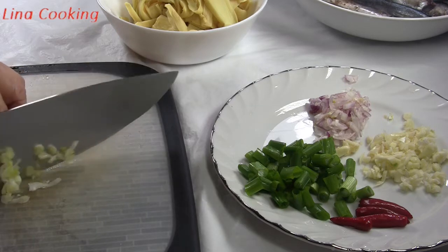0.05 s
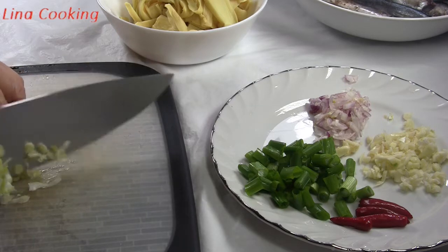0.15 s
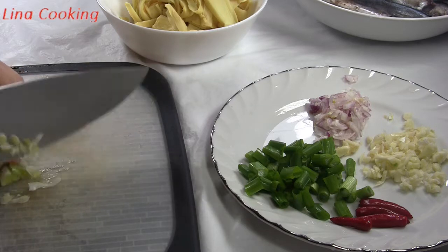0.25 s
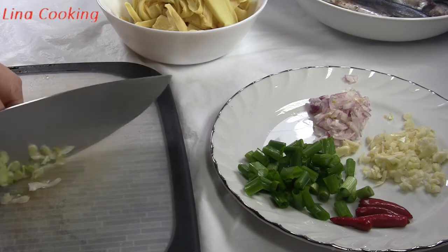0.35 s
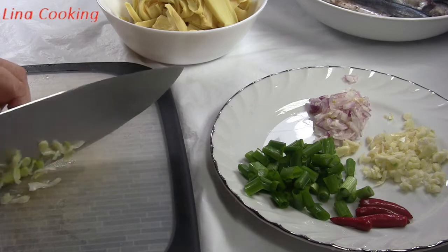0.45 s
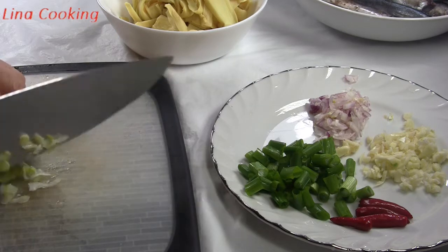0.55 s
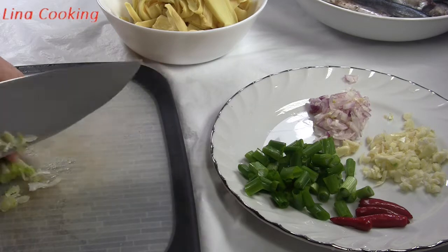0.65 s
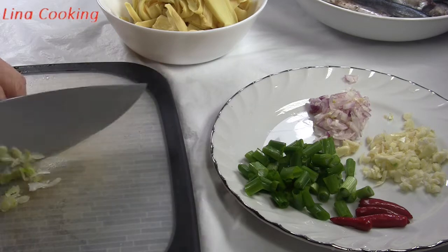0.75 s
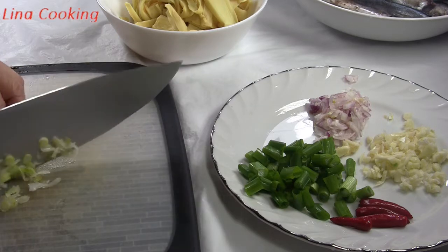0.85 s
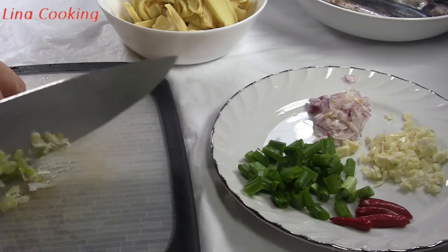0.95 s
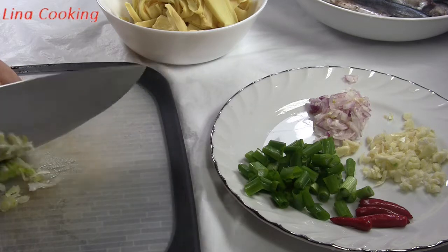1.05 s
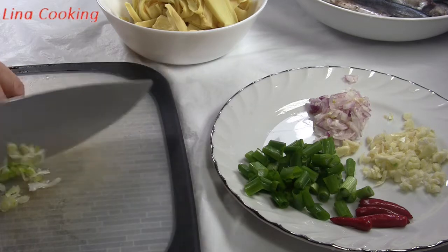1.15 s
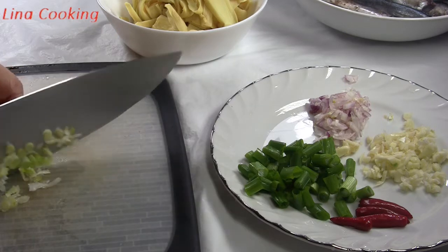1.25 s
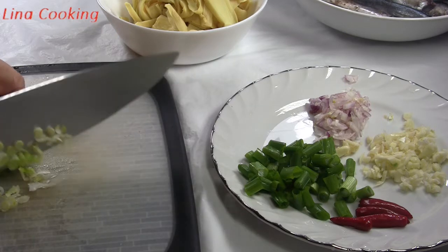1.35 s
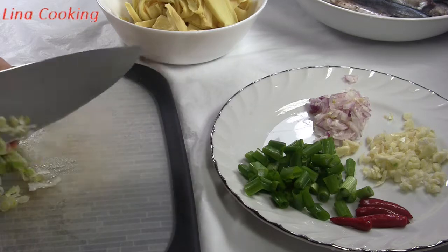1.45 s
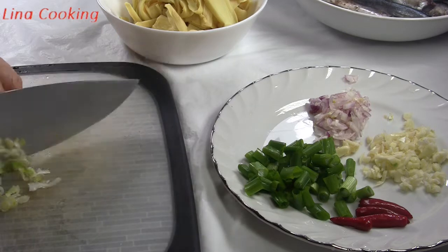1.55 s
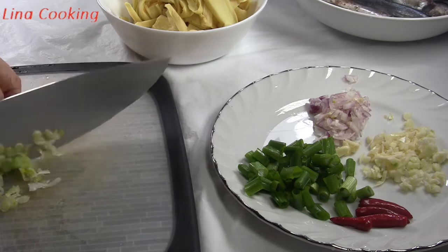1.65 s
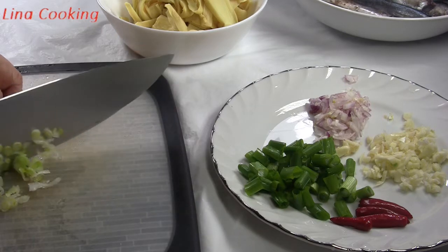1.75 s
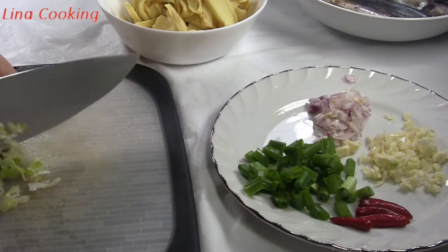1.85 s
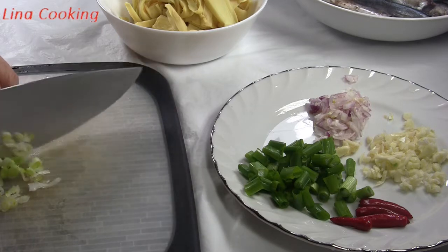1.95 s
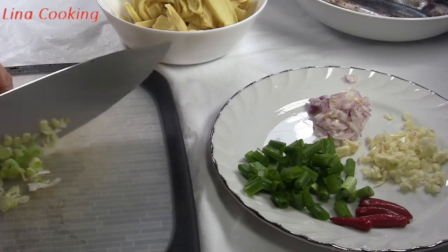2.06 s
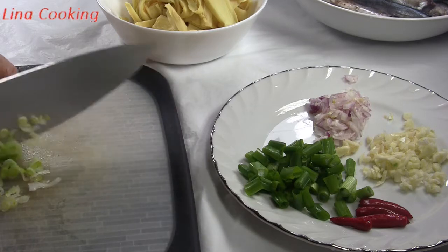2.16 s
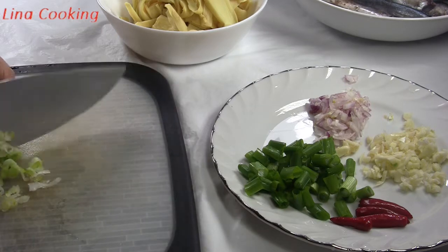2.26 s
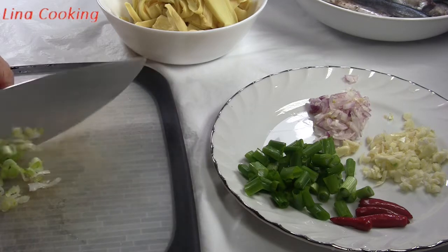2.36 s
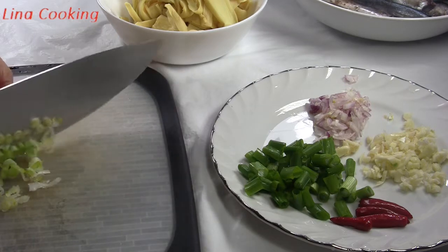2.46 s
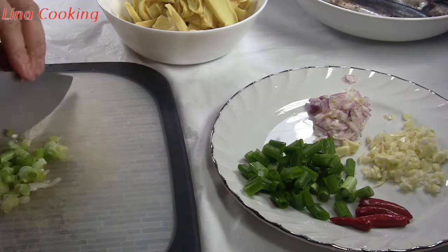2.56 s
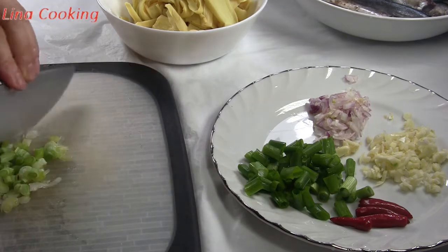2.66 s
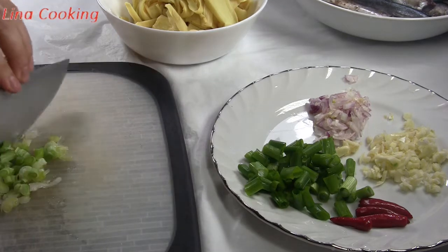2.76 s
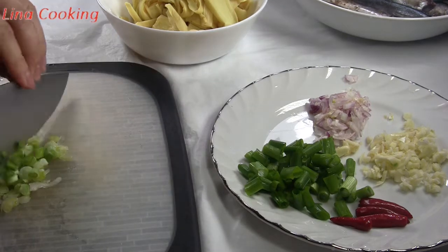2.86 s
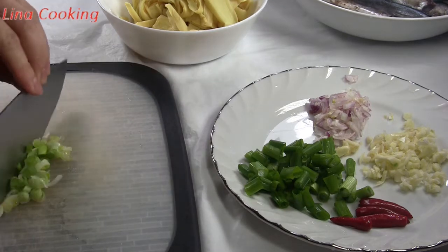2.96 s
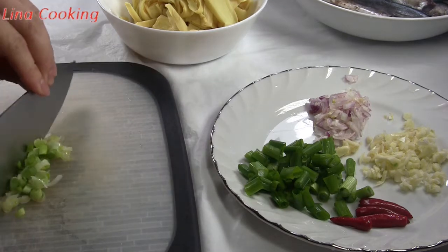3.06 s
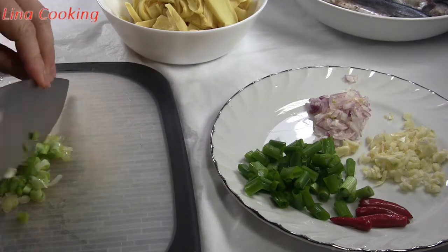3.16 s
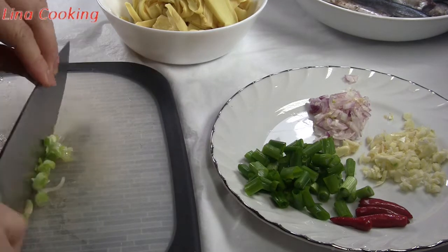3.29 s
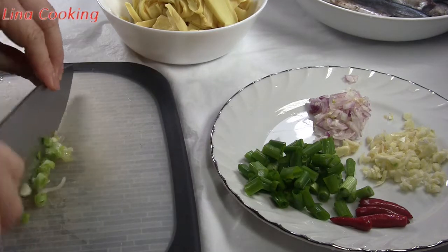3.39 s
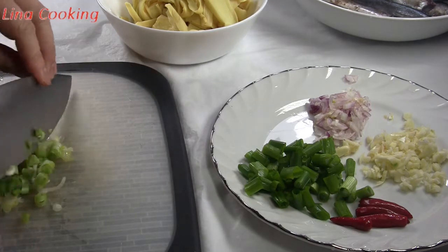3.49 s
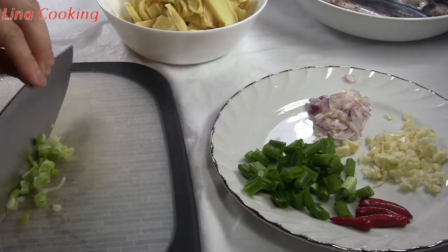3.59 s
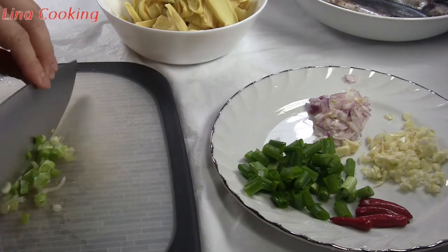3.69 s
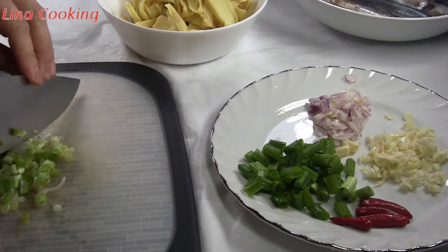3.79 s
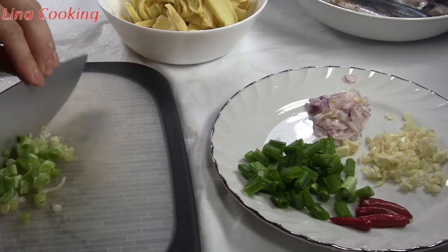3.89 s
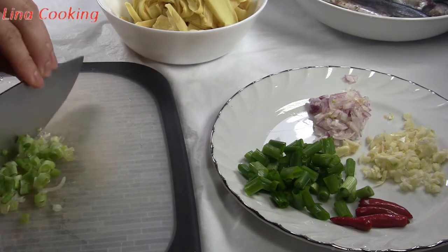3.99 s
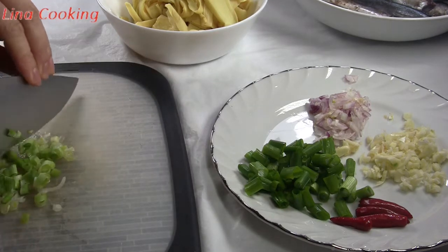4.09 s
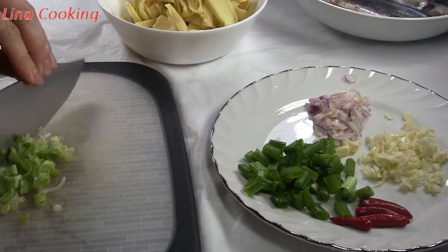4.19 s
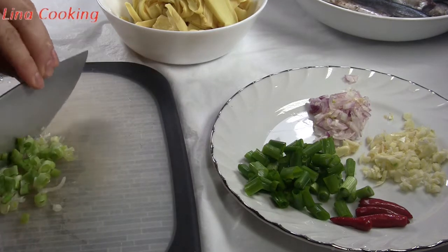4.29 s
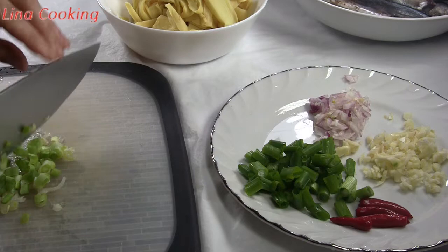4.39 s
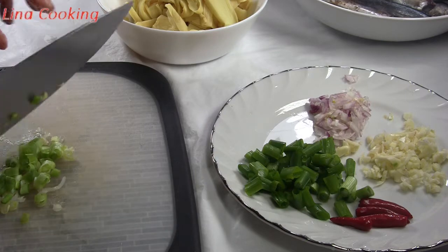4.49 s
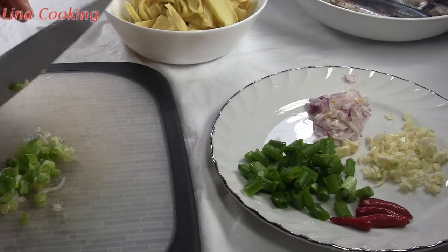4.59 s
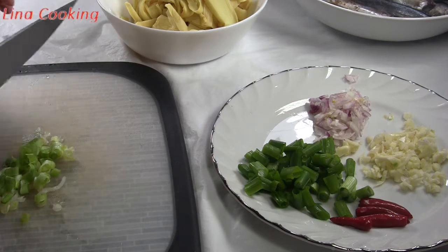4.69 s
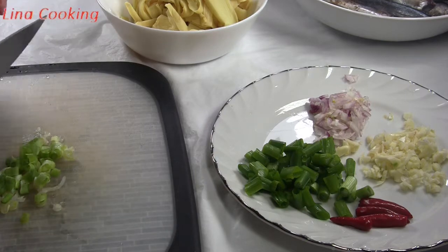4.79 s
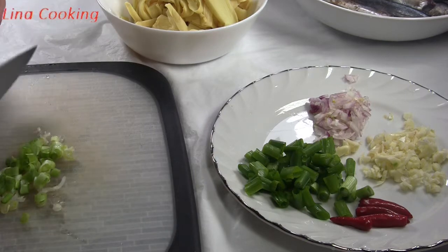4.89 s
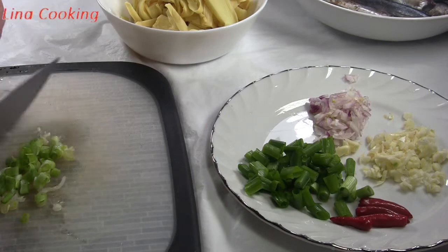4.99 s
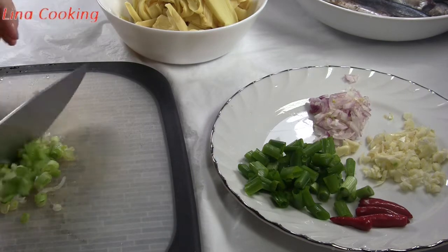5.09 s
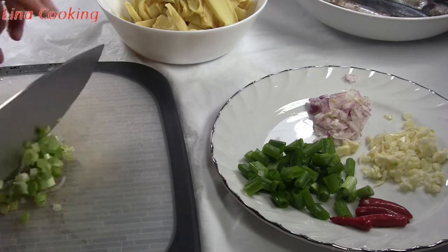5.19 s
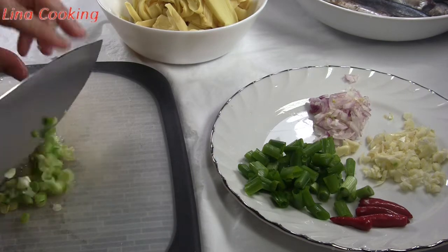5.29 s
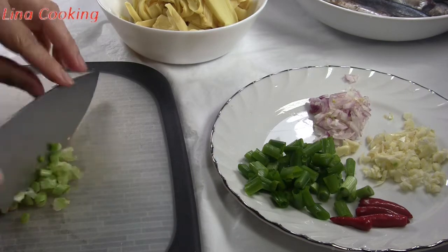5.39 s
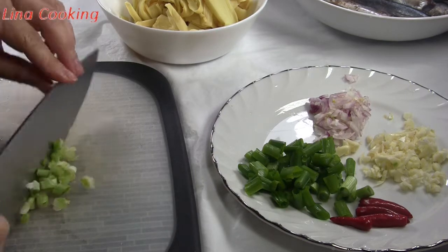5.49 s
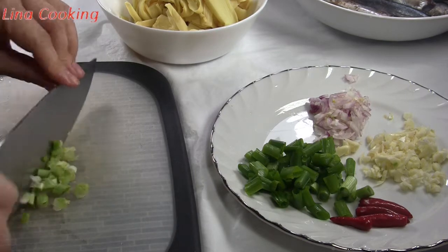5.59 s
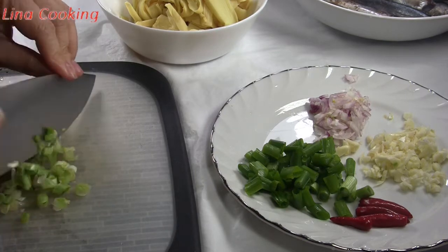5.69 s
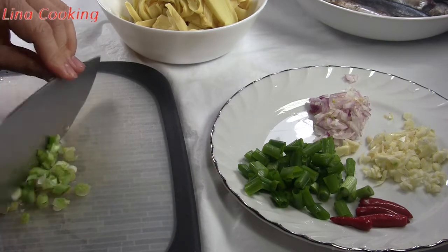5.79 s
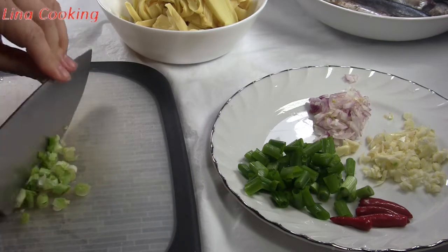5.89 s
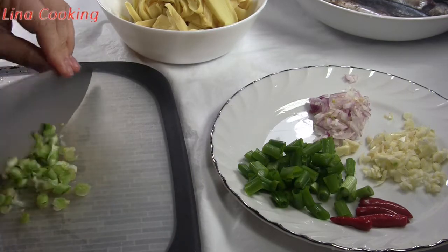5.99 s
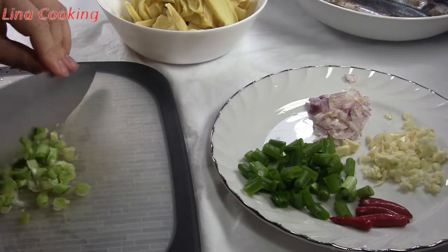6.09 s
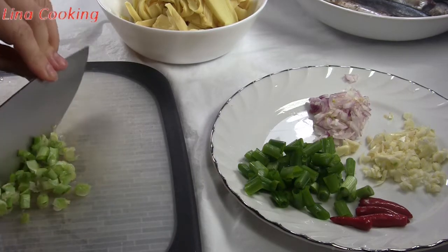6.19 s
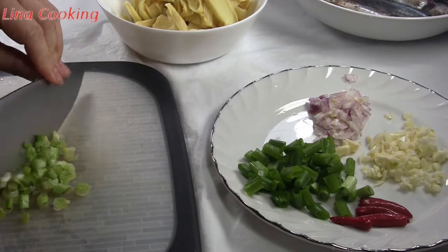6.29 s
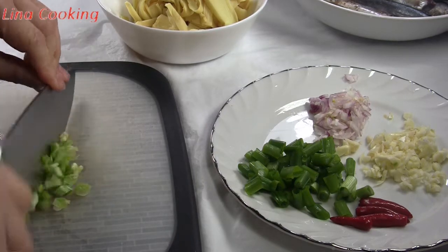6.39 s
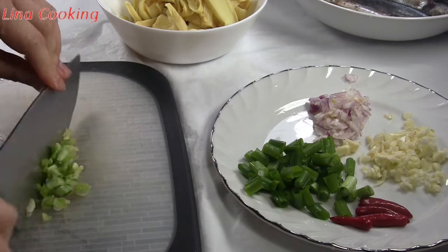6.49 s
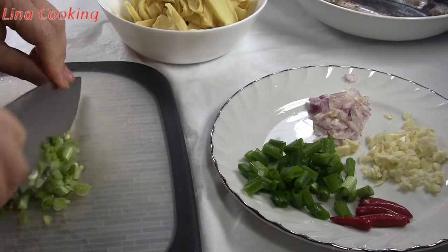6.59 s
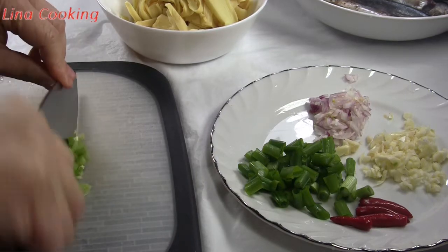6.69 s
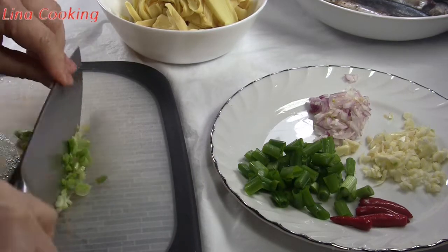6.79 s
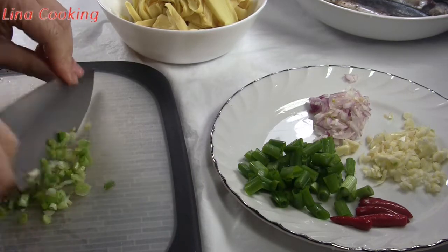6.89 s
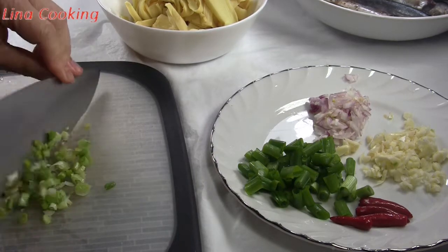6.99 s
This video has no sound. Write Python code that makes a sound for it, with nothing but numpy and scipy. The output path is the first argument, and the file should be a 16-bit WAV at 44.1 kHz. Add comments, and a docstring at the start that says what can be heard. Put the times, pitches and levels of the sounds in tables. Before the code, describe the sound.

Seven spaced knife blows knock sharply on a thin board over a table, each preceded by a tiny vegetable crunch. The blade then rocks through the pile with gentle crackling, fine hiss and dull closing knocks, pauses, clunks down with a quick steely scrape, and continues mincing. Close stereo microphones in a lightly reverberant kitchen, slightly overloaded by the hardest chops, with low air noise and hum.

```python
"""In a kitchen, microphones close to a plastic board hear a chef's knife mince spring onions over faint hum.
First come seven free chops, then rocking cuts, with light taps on the board between most of them: bursts of
tiny snaps make the crunch, and each stroke ends in a knock that rings the modes of board and table. After a
pause the blade is set down and scraped across the board, friction ringing its steel modes; then the rocking
goes on. Echoes and a diffuse tail answer from the room, and the peaks of the hardest chops are flattened."""
import sys
import numpy as np
from scipy import signal
from scipy.fft import rfft, irfft, next_fast_len
from scipy.io import wavfile

SR = 44100
rng = np.random.default_rng(int(sys.argv[2]) if len(sys.argv) > 2 else 0)


def store_pcm(level_fs):
    """Save levels as 16-bit WAV."""
    pcm = np.round(np.clip(level_fs, -1, 1) * 32767).astype(np.int16)
    wavfile.write(sys.argv[1], SR, np.atleast_2d(pcm).T)


N = 310905
T = np.arange(N) / SR


def from_db(db):
    """Decibels to gain."""
    return 10 ** (np.asarray(db) / 20)


def rms_one(x):
    """Scale to unit power."""
    return x / np.sqrt(np.mean(x ** 2) + 1e-20)


def at_hz(points, hz):
    """Read a table on a log-frequency axis."""
    table = np.array(points)
    return np.interp(np.log(np.maximum(hz, 1)), np.log(table[:, 0]), table[:, 1])


def butter(x, hz, kind, order=2):
    """Causal low- or high-pass."""
    sos = signal.butter(order, np.clip(hz, 10, .45 * SR), kind, fs=SR, output="sos")
    return signal.sosfilt(sos, x)


def colour(x, spectrum):
    """Give a steady sound a spectrum; rms 1."""
    size = next_fast_len(N)
    gain = from_db(at_hz(spectrum, np.fft.rfftfreq(size, 1 / SR)))
    return rms_one(irfft(rfft(x, size) * gain, size)[..., :N])


def drift(rate):
    """Random wander along straight lines between `rate` normal draws a second."""
    return np.interp(T * rate, np.arange(N // 10), rng.standard_normal(N // 10))


def delayed(x, lag_s):
    """The sound as it arrives lag_s later; the lag may change with time."""
    return np.interp(T - lag_s, T, x)


def add(out, s, sound):
    """Mix a sound in at time s."""
    i = max(round(s * SR), 0)
    out[i:i + len(sound)] += sound[:max(N - i, 0)]


def ring(force, hz, t60):
    """A mode radiating sound: a unit click sets it ringing at height 1; steady force makes none."""
    r, w = from_db(-60 / (t60 * SR)), 2 * np.pi * hz / SR
    return signal.lfilter([1 / 2, 0, -1 / 2], [1, -2 * r * np.cos(w), r * r], force + 1e-18)


def grains(per_s, spread_db):
    """Random tiny snaps of uneven size; rms 1."""
    sizes = from_db(spread_db * np.minimum(rng.exponential(1, N), 4)) * rng.choice([-1, 1], N)
    return rms_one(sizes * (rng.random(N) < per_s / SR))


# likeness of diffuse sound at the two microphones: (frequency [Hz], left-right correlation [-1 to 1])
MIC_LIKENESS = [(50, 0.49), (300, 0.73), (1000, 0.39), (2500, 0), (5000, 0.021), (15000, 0)]


def diffuse(size):
    """White stereo noise from all directions: alike in the bass, unrelated in the treble."""
    mid, side = rfft(rng.standard_normal((2, size)))
    alike = np.clip(at_hz(MIC_LIKENESS, np.fft.rfftfreq(size, 1 / SR)), -1, 1)
    shared = np.sqrt((1 + alike) / 2) * mid
    opposed = np.sqrt((1 - alike) / 2) * side * [[1], [-1]]
    return irfft(shared + opposed, size)


# spectrum of the kitchen's air: (frequency [Hz], relative level [dB])
AIR_SPECTRUM = [(20, -21), (40, -3.5), (70, 2.5), (105, -1), (150, 2.5), (200, 0.5), (280, 3.5), (480, -4),
                (1000, -14), (2500, -15.5), (8000, -22.5), (14000, -26.5)]


def background(air_db=-50, hum_hz=60, hum_db=-62):
    """Steady room air from all around, with a faint mains hum."""
    air = colour(diffuse(next_fast_len(N)), AIR_SPECTRUM)
    hum = np.sin(2 * np.pi * hum_hz * T)
    return from_db(air_db) * air + from_db(hum_db) * hum


# strength of the kitchen's reverberation: (frequency [Hz], level against the knife's own sound [dB])
TAIL_LEVEL = [(100, -7), (250, -5), (550, -2.5), (850, -12), (1300, -10), (2300, -16), (5000, -11),
              (12000, -8)]
# how long it lasts: (frequency [Hz], time to fall 60 dB [s])
TAIL_T60 = [(100, 0.45), (450, 0.59), (800, 0.66), (1600, 0.57), (4000, 0.45), (9000, 0.45), (15000, 0.15)]
# wall echoes: (delay [s], level [dB])
WALL_ECHOES = [(.0075, -17), (0.0248, -25.5), (0.0525, -43)]


def kitchen(x, build_s=0.0027, echo_hz=2500):
    """A few wall echoes and a diffuse tail that dies sooner in the treble."""
    t, edges = T[:SR], np.geomspace(60, 18000, 15)
    noise, hz, response = rfft(diffuse(SR)), np.fft.rfftfreq(SR, 1 / SR), np.zeros((2, SR))
    for low, high in zip(edges, edges[1:]):
        in_band = (hz >= low) * (hz < high)
        band = irfft(noise * in_band * from_db(at_hz(TAIL_LEVEL, hz)), SR)
        t60 = at_hz(TAIL_T60, np.sqrt(low * high))
        decay = from_db(-60 * t / t60) * (1 - np.exp(-t / build_s))
        response += band * decay / np.linalg.norm(decay)
    for s, db in WALL_ECHOES:
        echo = signal.unit_impulse(SR, round(s * SR))
        response += from_db(db) * butter(echo, echo_hz, "low", order=1)
    return signal.fftconvolve(x[None], response, axes=1)[:, :N]


# the steel blade's modes: (frequency [Hz], relative level when rubbed [dB], time to fall 60 dB [s])
BLADE_MODES = [(475, -28, 0.17), (836, -3, 0.011), (1576, -9, 0.13), (1643, -0.5, 0.073),
               (2243, -10, 0.079), (3720, -15, 0.39), (4180, -6.5, 0.071), (5340, -7.5, 0.037),
               (6200, -8.5, 0.068), (8550, -20, .06), (9600, -19, 0.093), (11200, -25, .08)]
# spectrum of the rubbing itself: (frequency [Hz], relative level [dB])
RUB_SPECTRUM = [(200, -1), (700, -11), (1500, 6.5), (2800, 7.5), (4200, 9.5), (6000, 3), (9000, 3),
                (12500, 4), (15500, -2)]
SET_DOWN_S = 4.9925
SCUFF_DB, SCUFF_S = -34, .009   # it scuffs as it lands: relative level, decay time
# then it skids sideways
SKID_S, SKID_DB, SKID_ATTACK_S, SKID_HOLD_S, SKID_RELEASE_S = 5.012, -25, 0.032, 0.051, 0.016


def scrape(rub_db=-1.0, blade_db=-4, bend_db=-18):
    """The blade lands and its first bending mode hums; then it skids, and friction rings all its modes."""
    rubbing, t = np.zeros(N), T[:SR // 2]
    release = np.exp(-np.maximum(t - SKID_ATTACK_S - SKID_HOLD_S, 0) / SKID_RELEASE_S)
    skid = np.minimum(t / SKID_ATTACK_S, 1) * release
    add(rubbing, SET_DOWN_S, from_db(SCUFF_DB) * np.exp(-t / SCUFF_S))
    add(rubbing, SKID_S, from_db(SKID_DB) * skid)
    slips = grains(per_s=7400, spread_db=0.5) * from_db(2.0 * drift(300))
    steel = np.zeros(N)
    for hz, db, t60 in BLADE_MODES:
        # each mode's build-up under steady rubbing is divided out
        build_up = np.sqrt(t60 * SR / (4 * np.log(1000)))
        steel += from_db(db) * ring(slips * rubbing, hz, t60) / build_up
    # the pitches waver as the point of contact slides along the edge
    steel = delayed(steel, .00015 * drift(35))
    out = from_db(rub_db) * rubbing * colour(slips, RUB_SPECTRUM) + from_db(blade_db) * steel
    bend_hz, _, bend_t60 = BLADE_MODES[0]
    add(out, SET_DOWN_S, from_db(bend_db) * ring(signal.unit_impulse(SR), bend_hz, bend_t60))
    return out


# free chops: (time the edge meets the board [s], blow [dB], thump [dB], time in the stalks [s], crunch [dB],
# swell of the crunch [dB], lead by which it grazes the pile earlier [s], graze [dB]); all levels relative
FREE_CHOPS = [(0.0649, -8.5, 4.5, 0.024, -25, 9.5, 0.043, -35.5),
              (.3948, -2, 0, 0.025, -21, 14.5, 0.045, -27), (0.86, -16, 0.5, 0.033, -25, 5, 0.07, -38.5),
              (1.2334, 2.5, -2.5, 0.025, -25.5, 4, 0.058, -41),
              (1.6764, 1, -5, 0.032, -25.5, 13.5, .067, -37),
              (2.0447, 2, -5, 0.019, -22.5, 5, 0.073, -39.5), (2.4111, 1, -5.5, 0.031, -25, 12, 0.086, -42)]
CHOP_FORCE_DB, GRAZE_FORCE_DB = 10.5, 1   # share of the crunch passed to the board
GRAZE_S, GRAZE_FADE_DB = 0.017, 12.5   # a graze fades to a faint crackle that lasts until the cut
# rocking cuts: (time the edge touches down [s], touch [dB], time to press through [s], crunch [dB],
# swell of the crunch [dB], closing knock [dB], thump [dB], drag on lifting [dB]); all levels relative
ROCKING_CUTS = [(2.713, -22, 0.045, -28.5, 14, -23.5, -12, -47.5),
                (2.9523, -5, 0.1, -33, 26, -23.5, -8, -47),
                (3.2968, -18, 0.052, -32.5, 4.5, -17.5, -3.5, -57),
                (3.613, -20, 0.052, -31, 4, -27, -7.5, -52.5),
                (3.927, -19.5, .056, -29.5, 25, -36, -27, -53),
                (4.238, -25.5, 0.055, -30.5, 5.5, -37, -14, -44),
                (5.502, -27, 0.064, -28, 4, -20.5, -9.5, -36.5),
                (5.841, -18.5, 0.057, -25.5, 13, -27, -21, -43.5),
                (6.171, -20.5, 0.053, -26, 17, -25, -6, -48), (6.456, -26, 0.047, -30, 18, -30, -8.5, -39),
                (6.777, -24.5, 0.053, -27.5, 24, -16.5, -18, -44.5)]
# share of the crunch passed to the board; part of the press after which the crunch stops growing
ROCK_FORCE_DB, ROCK_CREST = 2, 0.73
# the blade brushes the pile on its way down
BRUSH_S, BRUSH_DB, BRUSH_SWELL_DB, BRUSH_FORCE_DB = 0.041, -44, 20.5, 6.5
# the blade lifts out through the wet pile
DRAG_AFTER_S, DRAG_S, DRAG_FADE_DB, DRAG_FORCE_DB = 0.035, 0.049, 1.5, 0
# a firm stalk gives way at once: (time [s], crunch [dB], jolt to the board [dB]); levels relative
STALK_SNAPS = [(.0411, -29, -17), (.544, -30, -45), (2.003, -27, -23.5), (2.399, -28, -11),
               (3.957, -22.5, -31), (4.336, -30, -39), (5.8825, -29.5, -13.5), (6.192, -18, -12),
               (6.205, -17.5, -14.5), (6.488, -25.5, -32)]
SNAP_S, SNAP_FORCE_DB = 0.004, -4
# longer rustles, as the blade lifts out or nudges loose pieces:
# (time [s], length [s], crunch [dB], share passed to the board [dB]); levels relative
PILE_RUSTLES = [(0.063, 0.03, -38.5, 12.5), (.475, 0.033, -39, -12), (0.858, 0.053, -36, 8.5),
                (2.838, 0.024, -51.5, 19.5), (5.432, 0.062, -47, 0)]


def bites():
    """Every passage through onion: (s, length s, level dB, swell dB, swell time s, share to the board dB)."""
    rows = []
    for s, _, _, cut_s, db, swell_db, lead_s, graze_db in FREE_CHOPS:
        crackle_db = graze_db - GRAZE_FADE_DB
        rows += [(s - lead_s, lead_s - cut_s, crackle_db, -GRAZE_FADE_DB, GRAZE_S, GRAZE_FORCE_DB),
                 (s - cut_s, cut_s, db, swell_db, cut_s, CHOP_FORCE_DB)]
    for s, _, press_s, db, swell_db, _, _, drag_db in ROCKING_CUTS:
        lift_s = s + press_s + DRAG_AFTER_S
        rows += [(s - BRUSH_S, BRUSH_S, BRUSH_DB, BRUSH_SWELL_DB, BRUSH_S, BRUSH_FORCE_DB),
                 (s, press_s, db, swell_db, ROCK_CREST * press_s, ROCK_FORCE_DB),
                 (lift_s, DRAG_S, drag_db, -DRAG_FADE_DB, DRAG_S, DRAG_FORCE_DB)]
    rows += [(s, SNAP_S, db, 0, SNAP_S, SNAP_FORCE_DB) for s, db, _ in STALK_SNAPS]
    return rows + [(s, length, db, 0, length, force_db) for s, length, db, force_db in PILE_RUSTLES]


# spectrum of the bursting stalks: (frequency [Hz], relative level per Hz [dB])
CRUNCH_SPECTRUM = [(150, -17), (500, -7), (900, 6), (1650, 12), (2400, 3), (4000, 7.5), (6000, 7.5),
                   (9000, 2.5), (12500, 1.5), (15500, 0.5)]
# the board's plate modes: (frequency [Hz], relative level [dB], time to fall 60 dB [s])
BOARD_MODES = [(470, -16.5, 0.024), (581, -17, 0.031), (674, -16, 0.037), (797, -3, 0.018),
               (909, -15.5, 0.023), (1094, -28.5, 0.035), (1310, -21, 0.024), (1540, -19, 0.01),
               (1950, -48, 0.0021), (2870, -12, 0.004)]
# board and table bouncing together: (frequency [Hz], relative level [dB], time to fall 60 dB [s])
TABLE_MODES = [(138.6, -32, 0.085), (173, -27.5, 0.066), (226.2, -18, 0.06), (272, -17.5, 0.037),
               (357.6, -18.5, 0.034)]
ROCKING_S = 2.6   # from here on the blade rocks and slices


def cuts(bite_s=0.0029, release_s=0.0027, clump_db=3.0, board_db=-21, table_db=-2.5, soft_hz=2000,
         slice_db=-4, slice_hz=10500):
    """Cell walls burst in clumps under the edge: a bright crunch, while coarser snaps drum on the board."""
    loud, push, t = np.zeros(N), np.zeros(N), T[:SR // 6]
    for s, length, db, swell_db, swell_s, force_db in bites():
        level = from_db(db + swell_db * (np.minimum(t / swell_s, 1) - 1))
        stroke = level * (1 - np.exp(-t / bite_s)) * np.exp(-np.maximum(t - length, 0) / release_s)
        add(loud, s, stroke)
        add(push, s, stroke * from_db(force_db))
    clumps = rms_one(from_db(clump_db * drift(320)))
    crunch = colour(grains(per_s=12000, spread_db=3.5) * clumps, CRUNCH_SPECTRUM)
    # a rocking edge also slides through the wet stalks, with a fine hiss
    hiss = rms_one(butter(rng.standard_normal(N), slice_hz, "high", order=4))
    slicing = (T > ROCKING_S) * hiss
    jolts = butter(grains(per_s=1800, spread_db=0.5) * clumps * push, soft_hz, "low", order=1)
    plate = sum(from_db(db) * ring(jolts, hz, t60) for hz, db, t60 in BOARD_MODES)
    thump = sum(from_db(db) * ring(jolts, hz, t60) for hz, db, t60 in TABLE_MODES)
    drumming = plate + from_db(table_db) * thump
    return loud * (crunch + from_db(slice_db) * slicing) + from_db(board_db) * drumming


def cracks(low_hz=2200, decay_s=0.00061, crack_db=-24.5):
    """The last fibres give way as the edge lands: a short bright noise tops each free chop, level set by the
    blow."""
    out, t = np.zeros(N), T[:SR // 50]
    for s, blow_db, *_ in FREE_CHOPS:
        burst = rng.standard_normal(len(t)) * np.exp(-t / decay_s)
        add(out, s, from_db(blow_db + crack_db) * butter(burst, low_hz, "high"))
    return out


# light taps on the board between most rocking cuts: (time [s], relative level [dB])
LIGHT_TAPS = [(3.157, -24.5), (3.46, -25), (3.773, -22.5), (4.1, -26), (5.693, -23), (6.02, -26.5),
              (6.343, -27.5), (6.616, -26), (6.934, -24.5)]
TAP_DB, TAP_THUMP_DB, TAP_HZ = 3, -21.5, 1740   # added to every tap; thump; contact brightness
# contact brightness of a 0 dB blow; harder blows are brighter
CHOP_HZ, DB_PER_OCTAVE = 3170, 17
# contact brightness and weight of the touch; brightness of the cushioned closing knock
TOUCH_HZ, TOUCH_THUMP_DB, CLOSE_HZ = 2000, -12.5, 1590
SNAP_HZ, SNAP_THUMP_DB = 3050, -0.5   # contact brightness; thump relative to the jolt
# the blade is set down: blow, thump and contact brightness
SET_DOWN_DB, SET_DOWN_THUMP_DB, SET_DOWN_HZ = -1.5, -1, 1620


def blows():
    """Every blow or jolt to the board: (s, relative level dB, thump dB, contact brightness Hz)."""
    rows = [(SET_DOWN_S, SET_DOWN_DB, SET_DOWN_THUMP_DB, SET_DOWN_HZ)]
    for s, db, thump_db, *_ in FREE_CHOPS:
        rows.append((s, db, thump_db, CHOP_HZ * 2 ** (db / DB_PER_OCTAVE)))
    for s, touch_db, press_s, _, _, close_db, thump_db, _ in ROCKING_CUTS:
        rows += [(s, touch_db, TOUCH_THUMP_DB, TOUCH_HZ), (s + press_s, close_db, thump_db, CLOSE_HZ)]
    rows += [(s, db + TAP_DB, TAP_THUMP_DB, TAP_HZ) for s, db in LIGHT_TAPS]
    return rows + [(s, db, db + SNAP_THUMP_DB, SNAP_HZ) for s, _, db in STALK_SNAPS]


def knocks(cushion=0.16, thump_gain_db=4.0, plate_bass_hz=230, thump_lead_s=0.00487):
    """Each blow rings the board's modes, a little differently each time, and also thumps the table."""
    out, click = np.zeros(N), signal.unit_impulse(SR // 4)
    for s, db, thump_db, bright_hz in blows():
        force = butter(click, bright_hz, "low", order=4)   # a longer contact carries less treble
        plate = np.zeros(len(click))
        for hz, mode_db, t60 in BOARD_MODES:
            spot_db, detune = rng.standard_normal(2) * [1.6, .025]
            plate += from_db(mode_db + spot_db) * ring(force, hz * (1 + detune), t60)
        plate = butter(plate, plate_bass_hz, "high", order=1)   # bass leaks round the board's edges
        soft_force = butter(click, cushion * bright_hz, "low")   # a duller contact thumps deeper
        thump = np.zeros(len(click))
        for k, (hz, mode_db, t60) in enumerate(TABLE_MODES):
            # neighbouring modes swing in opposite senses
            thump += (-1) ** k * from_db(mode_db) * ring(soft_force, hz, t60)
        add(out, s, from_db(db) * plate)
        # started slightly early because the soft thump builds slowly
        add(out, s - thump_lead_s, from_db(thump_db + thump_gain_db) * thump)
    return out


def microphones(x, lag_s=.00009, left_db=-2.0, right_db=1.5, scatter_hz=2500, scatter_db=-10, count=4):
    """Right hears the knife later and louder; treble glances off the moving blade by ever-changing paths."""
    direct = np.array([from_db(left_db) * x, from_db(right_db) * delayed(x, lag_s)])
    treble = butter(x, scatter_hz, "high")
    glancing = np.zeros((2, N))
    for side, paths_s in enumerate(rng.uniform(.0005, .0025, (2, count))):
        for path_s in paths_s:
            glancing[side] += delayed(treble, path_s + .0002 * drift(5))
    return direct + from_db(scatter_db) * glancing


def scene(bass_hz=90):
    """Knife and board close by, the kitchen around them; so small a board radiates little bass."""
    close_sound = knocks() + cracks() + from_db(-1.5) * cuts() + scrape()
    knife = butter(close_sound, bass_hz, "high", order=1)
    surroundings = kitchen(knife) + background()
    return microphones(knife) + surroundings * from_db([[-1.0], [1.0]])   # left, right balance


def record(dry, top=1.0, cutoff_hz=16000):
    """The hardest peaks are flattened at full level, then the treble above cutoff_hz is cut."""
    squashed = dry / (1 + (dry / top) ** 6) ** (1 / 6)
    sos = signal.ellip(10, .05, 60, cutoff_hz, fs=SR, output="sos")
    return signal.sosfilt(sos, squashed)


dry = scene()
out = record(dry)
store_pcm(out)
```